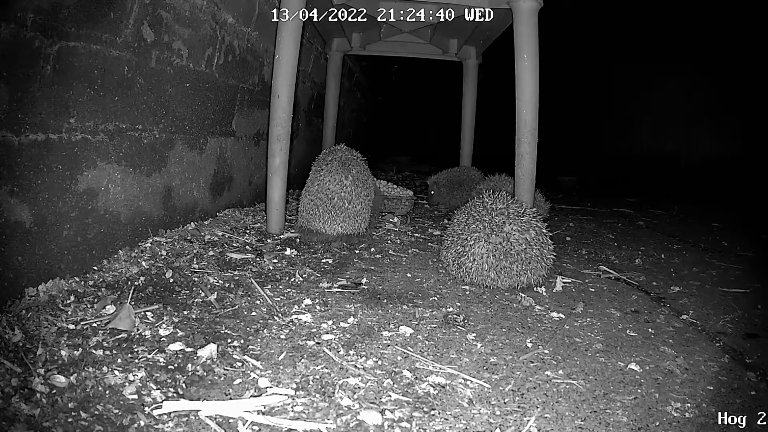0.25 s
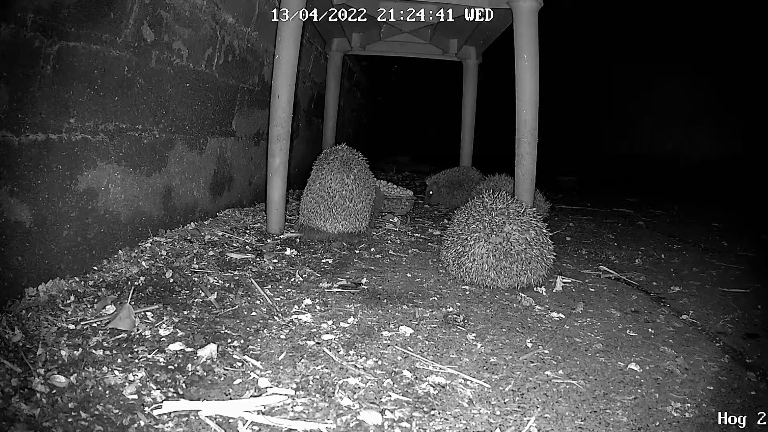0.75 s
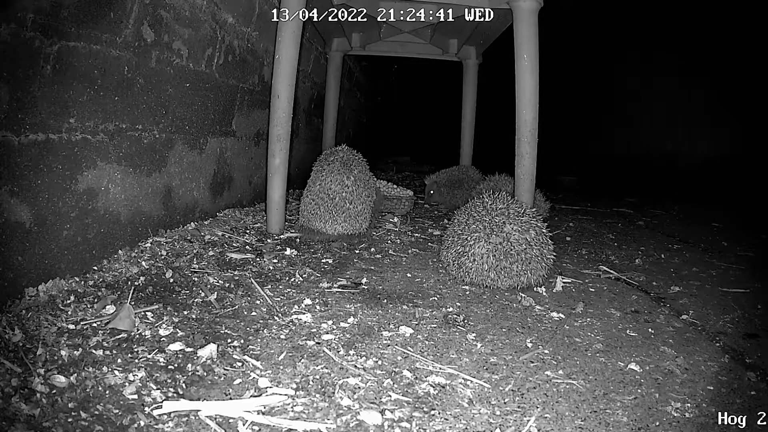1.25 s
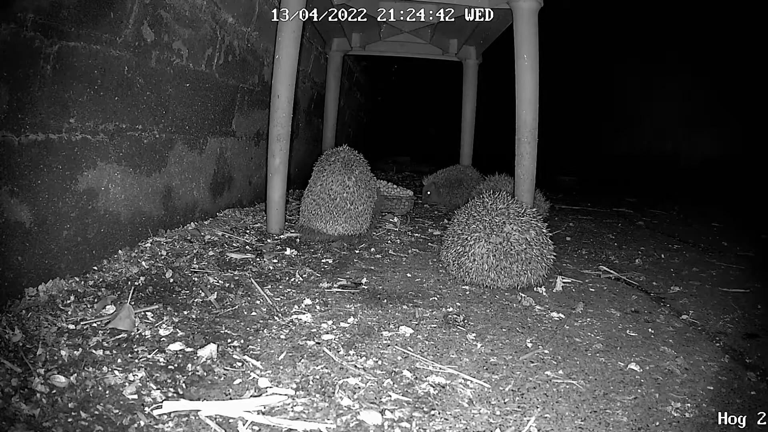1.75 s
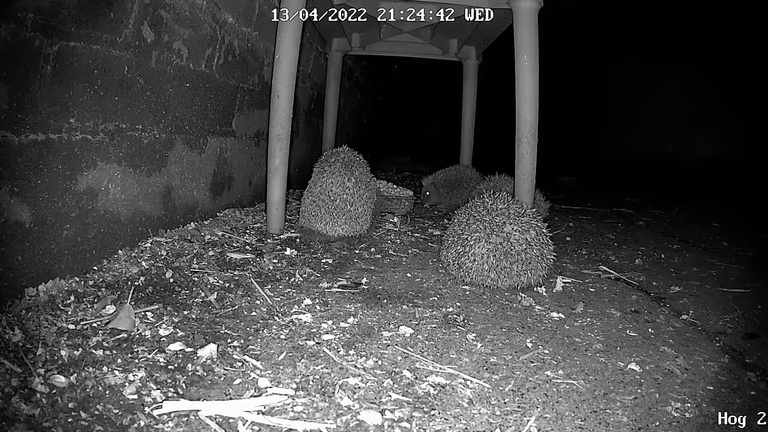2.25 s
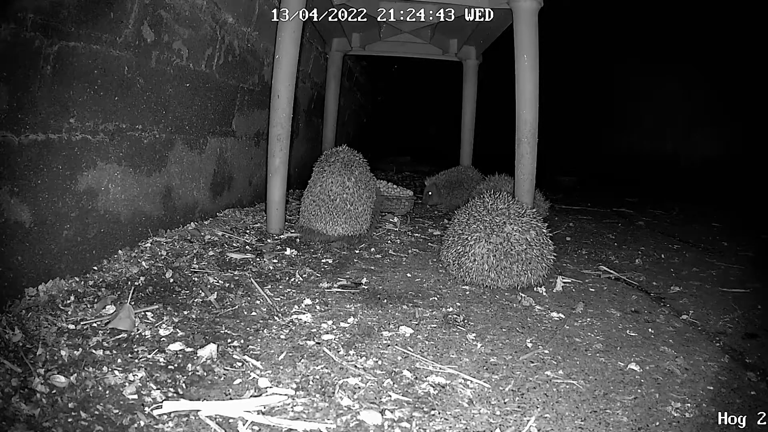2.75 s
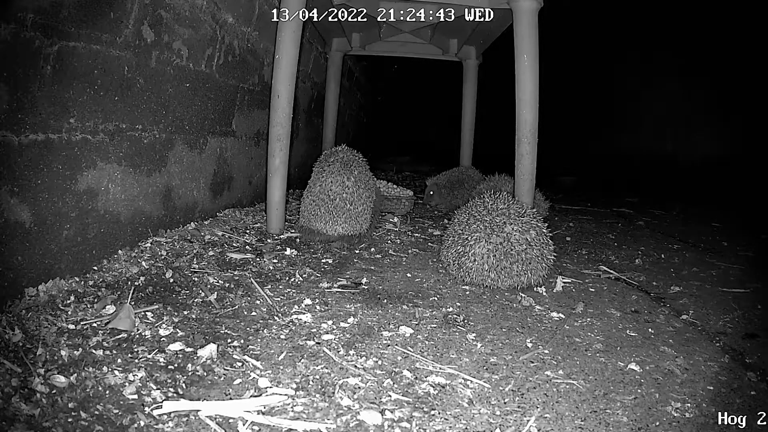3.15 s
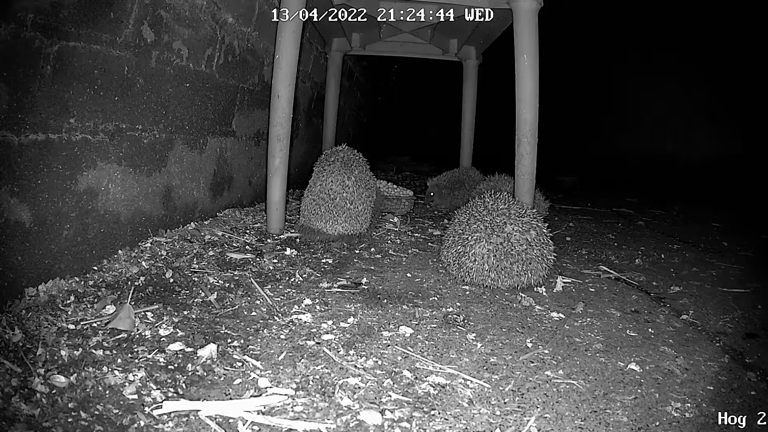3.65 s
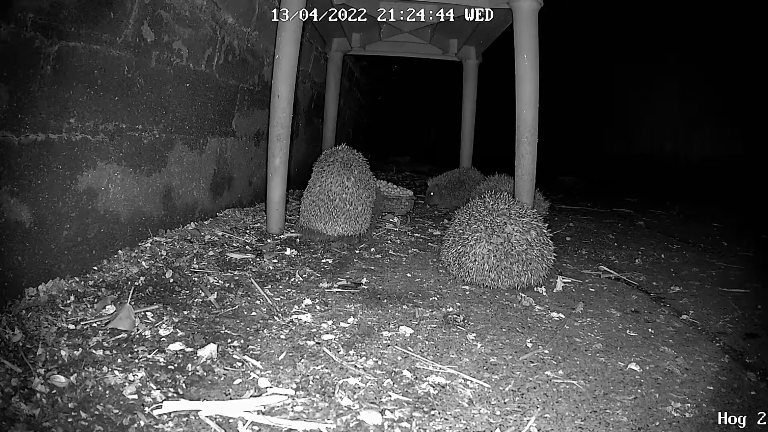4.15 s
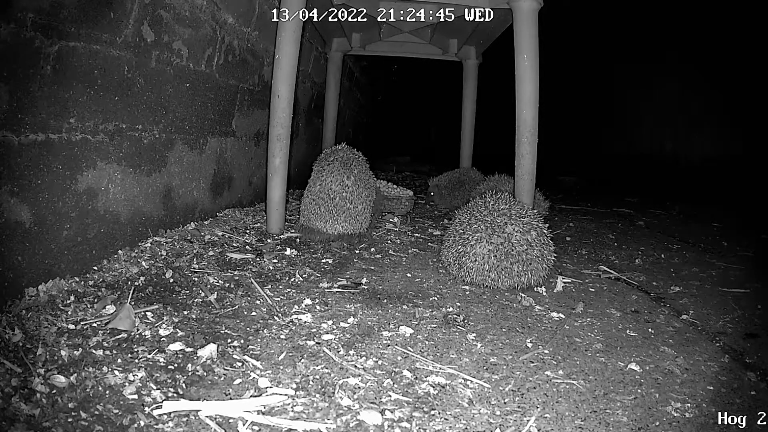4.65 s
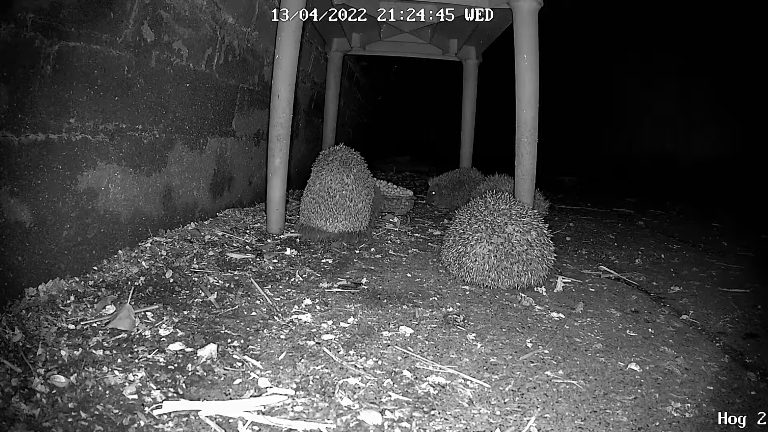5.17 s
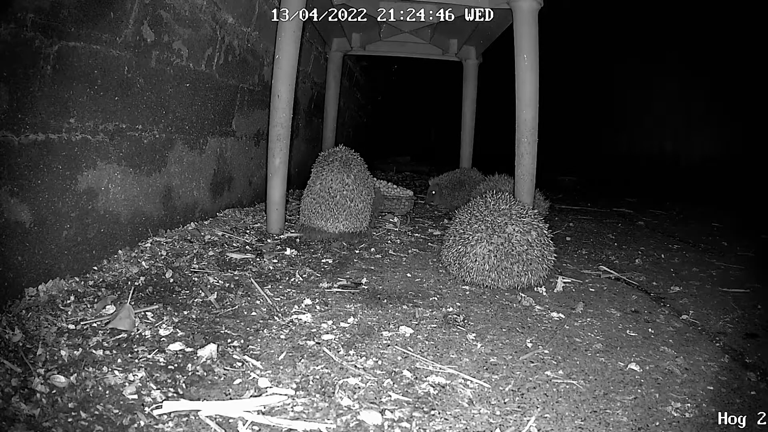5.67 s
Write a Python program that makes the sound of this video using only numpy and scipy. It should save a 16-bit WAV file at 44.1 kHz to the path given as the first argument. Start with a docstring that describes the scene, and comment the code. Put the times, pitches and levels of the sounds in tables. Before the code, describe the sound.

Brittle crunches and fine crackling chews from feeding hedgehogs, above dark night rumble, an intermittent low hum and faint regular high ticks.

```python
"""Dry biscuits snap between teeth, and chews grind the crumbs into a soft crackle: hedgehogs feed at night.
Each snap is a click with a run of smaller breaks, scattered by ground and wall and coloured by the dish.
The grinding is tiny pings on filtered noise; a gritty scrape and a thin squeak are heard as well.
Beneath lie steady night noise, a throbbing noise hum that switches on and off, and faint thin high ticks
at a strict rate. A wildlife camera rolls off the treble."""
import sys
import numpy as np
from scipy import signal
from scipy.fft import rfft, irfft, next_fast_len
from scipy.io import wavfile
from scipy.ndimage import uniform_filter1d, map_coordinates

SR = 44100
rng = np.random.default_rng(int(sys.argv[2]) if len(sys.argv) > 2 else 0)


def generate_wav(signal):
    """Clip the signal to [-1, 1] and save it as 16-bit WAV at the path in sys.argv[1]."""
    frames = np.transpose(np.atleast_2d(signal))
    scaled = np.clip(frames, -1, 1) * 32767
    pcm = np.round(scaled).astype(np.int16)
    wavfile.write(sys.argv[1], SR, pcm)


N = 260631

# Night background. Each row: frequency in Hz, relative density in dB per Hz.
NIGHT_SPECTRUM = [(10, -12), (25, 5), (55, 1.5), (100, -5.5), (200, -11), (300, -16), (550, -21.5),
                  (950, -20.5), (1250, -25), (1800, -33.5), (3000, -47), (6500, -44.5)]
# Low hum. Each row: frequency in Hz, relative density in dB per Hz.
HUM_SPECTRUM = [(8, -8), (20, 2), (60, -3), (110, -4.5), (160, -18), (210, -16), (300, -25), (500, -31.5),
                (1500, -51.5), (6000, -82.5)]
# Hiss that comes with the hum. Each row: frequency in Hz, relative density in dB per Hz.
FIZZ_SPECTRUM = [(2500, -22.5), (5000, -14), (5900, 0.5), (6400, 0), (7000, -9)]
# Stretches of hum. Each row: start in seconds, end in seconds, level in dB, mean peak of its throbs in dB.
HUM_STRETCHES = [(-.1, 1.056, -49.5, -48.5), (1.894, 3.45, -49.5, -47), (3.564, 3.717, -50, -48),
                 (3.992, 4.711, -50.5, -42)]
# Upper tone of the squeak. Each row: time in seconds, pitch in Hz, level before its wavering in dB.
SQUEAK_GLIDE = [(3.43, 6900, -90), (3.465, 6900, -74), (3.495, 6780, -73.5), (3.507, 6980, -73),
                (3.535, 6830, -73.5), (3.56, 6920, -73), (3.575, 6780, -74), (3.59, 6780, -95)]
# Scrape at the dish. Each row: time in seconds, level in dB.
SCRAPE_LEVEL = [(5.81, -110), (5.832, -68), (5.845, -60), (5.862, -54.5), (5.878, -52.5), (5.91, -57)]
# Colour of the scrape. Each row: frequency in Hz, relative level in dB.
SCRAPE_SPECTRUM = [(150, -14), (500, -10.5), (800, -1), (1200, -1.5), (1500, -16), (3000, -11.5),
                   (4400, -12.5), (6500, -19.5)]
# Chews. Each row: time of firmest pressure in seconds, level before the common gain in dB,
# length in seconds, treble relative to the rest as the mouth opens in dB.
CHEW_STROKES = [(0.152, -70.5, 0.36, -2), (0.436, -72, 0.14, -2), (0.664, -73.5, 0.077, -5),
                (1.014, -67.5, 0.11, 2), (1.265, -72.5, 0.24, 3.5), (1.386, -71, 0.36, 6.5),
                (1.628, -77, 0.7, 3), (1.865, -65.5, 0.12, 6), (1.906, -60.5, 0.14, 5.5),
                (2.093, -66.5, 0.12, -6), (2.196, -62.5, 0.15, -2), (2.453, -63.5, 0.15, 1),
                (2.58, -68, 0.14, 3), (2.772, -62.5, .19, -1), (3.054, -68.5, 0.23, -1),
                (3.362, -70, 0.38, 2.5), (3.634, -66.5, 0.14, -6), (3.915, -72, 0.32, -4),
                (4.062, -75.5, 0.29, 3), (4.252, -72, 0.34, -1), (4.572, -76, 0.099, 0),
                (4.813, -70.5, 0.072, -1), (4.947, -78, 0.28, 1), (5.283, -72.5, 0.2, -2),
                (5.559, -72.5, 0.22, 1)]
# Colour of the grinding. Each row: frequency in Hz, relative level in dB.
CRUMB_SPECTRUM = [(400, -34), (1400, -10), (1900, -2.5), (2500, -0.5), (2900, 0.5), (3250, -0.5),
                  (3850, -2.5), (4300, 2.5), (4650, -3.5), (5100, -10), (5700, -1.5), (6400, -5),
                  (7000, -11.5)]
# Biscuit snaps and tooth clicks. Each row: time in seconds, level of the click over 1 ms before the common
# gain in dB, pitch of the fragment in Hz, spill outside its band in dB.
BISCUIT_SNAPS = [(0.099, -63, 3400, -15), (0.155, -62, 4260, -15), (0.16, -59, 4400, -15),
                 (0.1698, -54, 3340, -13), (0.1845, -61, 4780, -11), (0.207, -57, 4830, -10),
                 (0.213, -62, 3780, -7), (0.2334, -44.0, 3760, -12.5), (0.2597, -57.5, 3100, -14),
                 (0.4291, -61.5, 3200, -19), (0.458, -65, 4000, -9), (0.647, -57.5, 4030, -14),
                 (0.666, -60.5, 3900, -11), (0.742, -38, 5700, -3), (0.7492, -46, 6600, -5),
                 (0.7513, -42.5, 3410, 6), (0.829, -38, 1960, -5.5), (0.833, -51.5, 1200, 2),
                 (0.8374, -56, 4200, -7), (0.848, -55, 3920, 0), (0.994, -57, 3290, 0),
                 (1.007, -45, 4240, -6.5), (1.085, -44.0, 3780, -4), (1.1308, -59.5, 2920, -3),
                 (1.1596, -35.5, 6000, 6), (1.1665, -34, 6600, -9.5), (1.2184, -63.5, 4700, 0),
                 (1.28, -64, 3770, -12), (1.331, -68, 4580, -11), (1.339, -58, 4060, -14),
                 (1.3511, -43, 3960, -14), (1.357, -53, 3500, -2), (1.3815, -41, 5000, -11),
                 (1.4121, -48.5, 5200, -13), (1.5694, -29, 2100, 1), (1.5766, -34.0, 4200, -5.5),
                 (1.7228, -56.5, 4000, -11), (1.7752, -40, 3900, -7), (1.781, -48, 1700, 15),
                 (1.8342, -40.5, 4000, -10), (1.8368, -44.5, 4330, -4), (1.8425, -50, 3360, -6),
                 (1.8986, -56, 4300, -5), (1.904, -43.5, 5060, -12), (1.924, -50, 2770, -6),
                 (2.1033, -53.5, 3180, -9), (2.1278, -51.5, 3940, -12), (2.1344, -64, 4600, -10),
                 (2.15, -44, 3280, -9), (2.1791, -60, 4060, -8), (2.1835, -43.5, 3600, -2),
                 (2.21, -57, 3000, -13), (2.2413, -61, 2170, -2), (2.4554, -56.5, 4340, -17),
                 (2.4695, -50, 3780, -14), (2.474, -53, 4200, -9), (2.4767, -50, 4100, -17),
                 (2.4797, -45.5, 3600, -14), (2.5236, -57.0, 4350, -9), (2.5282, -36, 4230, -7),
                 (2.5333, -62, 4660, -6), (2.5553, -51, 3500, -1), (2.5642, -57.0, 3250, -11),
                 (2.7415, -59, 3900, -18), (2.7542, -55, 4060, -12), (2.7612, -48, 4060, -12),
                 (2.764, -50, 4200, -25), (2.767, -54, 3920, -14), (2.7987, -51, 3170, -6),
                 (2.8503, -52, 2720, -12.5), (3.0216, -60, 3650, -23), (3.0273, -44.5, 3840, -26),
                 (3.0447, -52, 3900, -13), (3.047, -45, 3800, -13.5), (3.051, -49.5, 3410, -11),
                 (3.0665, -59, 3650, -5), (3.1118, -60, 3440, -8), (3.32, -64, 3870, -16),
                 (3.3312, -49, 4130, -10), (3.3504, -59, 3650, -17), (3.3716, -50, 4600, -10),
                 (3.375, -60, 3970, -15), (3.436, -65, 3860, -12), (3.4561, -47.5, 2340, -10),
                 (3.599, -62, 4150, -12), (3.6033, -60, 3590, -9), (3.6225, -51, 3410, -17),
                 (3.6252, -47, 3130, -13), (3.6284, -46, 3480, -10), (3.6386, -62, 3740, -10),
                 (3.6519, -60, 3700, -12), (3.6553, -62, 3320, -20), (3.678, -59, 4200, 2),
                 (3.7258, -57.5, 1910, -22), (3.899, -50.5, 3760, -24), (3.9224, -42, 2600, -7.5),
                 (3.9307, -52, 3300, -21), (3.9344, -56, 2070, -6), (3.98, -60, 2410, -21),
                 (4.0533, -66, 3670, -9), (4.0715, -66.5, 3530, -1), (4.1533, -61.5, 3870, -16),
                 (4.1835, -63.5, 3800, -15), (4.251, -53, 4060, -7), (4.263, -64, 4850, -8),
                 (4.2723, -58, 3200, -7), (4.333, -63.5, 4350, -7), (4.36, -63.5, 4200, -4),
                 (4.584, -65, 4400, -7), (4.8176, -63, 3410, -16), (4.8528, -53.5, 3250, -12),
                 (5.276, -52, 4070, -19), (5.282, -59, 3670, -3), (5.288, -56.5, 3500, -14),
                 (5.289, -58, 4030, -5), (5.29, -57.5, 3000, -18), (5.2937, -65, 3780, -5),
                 (5.2938, -68, 4200, -10), (5.5038, -63, 3900, -11), (5.532, -64, 3290, -13),
                 (5.6715, -52.5, 3940, -15), (5.6736, -56, 4120, -7), (5.6764, -59, 3750, -7),
                 (5.7422, -35.5, 5800, -9), (5.774, -52.5, 5950, -12), (5.841, -69, 4170, -9),
                 (5.8575, -65, 3200, -6), (5.8711, -32, 5900, -11.5), (5.8895, -61, 3400, -8)]
# Colour of teeth, dish and shelter. Each row: frequency in Hz, relative level in dB.
BITE_SPECTRUM = [(200, -32), (600, -11.5), (850, -6), (1150, -7.5), (1350, -5.5), (1850, 2.5), (2450, 0.5),
                 (2850, 4), (3250, -3), (3600, -1), (3900, -5), (4300, 5), (4650, 3), (5100, -4.5),
                 (5700, 0.5), (6300, -0.5), (6900, -7)]
# Faint ringing of the dish. Each row: frequency in Hz, mean relative level in dB.
DISH_MODES = [(1558, 6), (1865, -5), (2306, 3), (2834, 3.5), (3234, 5), (3554, 3.5), (4497, -13.5),
              (5663, -4), (6341, 6.5)]
# Hollow knock of the dish. Each row: frequency in Hz, mean relative level in dB.
KNOCK_MODES = [(540, -5), (830, -1.5), (1050, -5.5), (1200, 3.5)]
# Treble response of the camera. Each row: frequency in Hz, gain in dB.
CAMERA_RESPONSE = [(6500, 0), (6900, 2), (7300, -7), (7700, -16.5), (8200, -23)]

CAMERA_TOP_HZ = 8200
TICK_FIRST_S, TICK_PERIOD_S = 0.0294, 0.1024
THROBS_PER_S = 15  # mean rate
CHEW_DEPTH_DB, SWELL_SHARE = 18, 0.45  # swell in dB, and its share of the chew length
MUNCH_DB = -88  # grinding between the chews
MOUTH_HZ = 4900  # treble let out by the open mouth starts here
RUSTLE_GAIN = 0.6  # relative to the pings
BAND_HZ, BAND_OCTAVES = 4200, 0.29  # fragments below this pitch ring in a wider band
SPLINTER_T60_S, DISH_T60_S = 0.012, 0.04


def amp(db):
    """Decibels to gain."""
    return 10 ** (np.asarray(db) / 20)


def unit(x):
    """Scale to rms 1."""
    return x / np.sqrt(np.mean(x ** 2) + 1e-20)


def along(points, hz):
    """Values of (Hz, value) points, interpolated on a log frequency axis."""
    f, v = np.transpose(points)
    return np.interp(np.log(hz + 1), np.log(f + 1), v)


def curve(rows):
    """(s, value) rows as one value per sample."""
    return np.interp(np.arange(N) / SR, *np.transpose(rows))


def filtered(x, gain):
    """x times a gain that depends on frequency."""
    m = next_fast_len(N + SR // 2)
    return irfft(rfft(x, m) * gain(np.fft.rfftfreq(m, 1 / SR)), m)[:N]


def coloured(x, spectrum):
    """x filtered by a dB spectrum, at rms 1."""
    return unit(filtered(x, lambda hz: amp(along(spectrum, hz))))


def causal(db, size=1024):
    """Minimum-phase impulse response of energy 1: sharp in front, ringing behind."""
    cepstrum = irfft(np.log(amp(db)))
    cepstrum[1:size // 2] *= 2
    cepstrum[size // 2 + 1:] = 0
    h = irfft(np.exp(rfft(cepstrum)))
    return h / np.linalg.norm(h)


def add(track, s, sound):
    """Mix a sound in at time s."""
    i = int(np.clip(round(s * SR), 0, N))
    track[i:i + len(sound)] += sound[:N - i]


def grains(times, pitch_hz, scatter, life_s, spread_db):
    """Tiny damped pings at the given times, each with its own pitch and size; rms 1."""
    t = np.arange(SR // 100) / SR
    track = np.zeros(N)
    for s, (pitch, size) in zip(times, rng.standard_normal((len(times), 2))):
        own_hz = pitch_hz * np.exp(scatter * pitch)
        ping = np.sin(2 * np.pi * own_hz * t) * np.exp(-t / life_s)
        add(track, s, amp(spread_db * min(size, 2)) * ping)
    return unit(track)


def night(level_db=-56):
    """Steady low rumble with a faint hiss: coloured noise."""
    return amp(level_db) * coloured(rng.standard_normal(N), NIGHT_SPECTRUM)


def strict_ticks(level_db=-65.02, pitch_hz=5750, life_s=0.00032, vary_db=1.0):
    """Faint thin high ticks at a strict rate, uneven in strength: short damped sines."""
    t = np.arange(SR // 100) / SR
    envelope = t / life_s * np.exp(1 - t / life_s)
    tick = np.sin(2 * np.pi * pitch_hz * t) * envelope
    track = np.zeros(N)
    for s in np.arange(TICK_FIRST_S, N / SR, TICK_PERIOD_S):
        add(track, s, amp(level_db + vary_db * rng.standard_normal()) * tick)
    return track


def hum(edge_s=0.0079, evenness=0.76, fizz_db=-28, tick_hz=5900, tick_count=420):
    """Low noise hum without a pitch that switches on and off, with a faint high fizz."""
    t = np.arange(N) / SR
    level = np.zeros(N)
    for start, end, db, _ in HUM_STRETCHES:
        level += amp(db) * np.clip(np.minimum(t - start, end - t) / edge_s + .5, 0, 1)
    rumble = coloured(rng.standard_normal(N), HUM_SPECTRUM)
    # Dividing by part of its own short-term power evens out the rumble.
    power = np.abs(uniform_filter1d(rumble ** 2, size=2600)) + 1e-6
    even_rumble = unit(rumble / power ** (evenness / 2))
    tick_times = rng.random(tick_count) * N / SR
    ticks = grains(tick_times, tick_hz, scatter=0.04, life_s=0.001, spread_db=10)
    fizz = unit(coloured(rng.standard_normal(N), FIZZ_SPECTRUM) + .5 * ticks)
    return level * (even_rumble + amp(fizz_db) * fizz)


def throbs(width_s=0.0022, sag=0.069, recover_s=0.0058, jitter_s=0.01607, vary_db=4.0):
    """Uneven throbs of the hum: each one rounded push followed by a shallow sag."""
    t = np.arange(SR // 10) / SR - .02
    push = np.exp(-(t / width_s) ** 2) - sag * np.exp(-(t / recover_s - 1) ** 2)
    track = np.zeros(N)
    for k, (late, force) in enumerate(rng.standard_normal(size=(200, 2))):
        s = k / THROBS_PER_S + jitter_s * late
        for start, end, _, db in HUM_STRETCHES:
            if start < s < end:
                add(track, s + t[0], amp(db + vary_db * force) * push)
    return track


def squeak(lower_db=-1, lower_ratio=0.872, waver_db=3, jitter_hz=85):
    """Two thin, rough tones that glide together, each unsteady in pitch and strength."""
    rows = np.array(SQUEAK_GLIDE)
    noise = rng.standard_normal((2, 2, N))
    waver, jitter = unit(uniform_filter1d(noise, size=80, axis=2))
    pitch_hz = np.outer([1, lower_ratio], curve(rows[:, :2])) + jitter_hz * jitter
    tones = np.sin(2 * np.pi * np.cumsum(pitch_hz, axis=1) / SR)
    upper, lower = tones * amp(waver_db * (waver - 1.0))
    t = np.arange(N) / SR
    sounding = (t > rows[0, 0]) * (t < rows[-1, 0])
    return amp(curve(rows[:, ::2])) * sounding * (upper + amp(lower_db) * lower)


def scrape(rough=0.57, catch_db=4, catch_s=0.003):
    """Short gritty scrape at the dish: spiky noise whose strength wavers as it catches and slips."""
    t = np.arange(N) / SR
    grit = rng.standard_normal(N) * np.exp(rough * rng.standard_normal(N))
    drift = map_coordinates(rng.standard_normal(N // 8), [t / catch_s], mode='wrap')
    catches = amp(catch_db * np.clip(drift, -1.5, 1.5))
    level = amp(curve(SCRAPE_LEVEL)) * (t > SCRAPE_LEVEL[0][0])
    return level * coloured(grit * catches, SCRAPE_SPECTRUM)


def stroke(s, db, swell_db_per_s, ease_db_per_s):
    """Gain that swells to its peak at time s and then dies away, both linear in dB."""
    t = np.arange(N) / SR - s
    return amp(db + np.minimum(swell_db_per_s * t, -ease_db_per_s * t))


def chewing(pitch_hz=4000, gain_db=1, life_s=0.00025, count=6000):
    """Crumbs ground between the jaws: tiny uneven pings on a fine rustle, swelling with each chew."""
    pings = grains(rng.random(count) * N / SR, pitch_hz, scatter=.3, life_s=life_s, spread_db=7)
    rustle = coloured(rng.standard_normal(N), CRUMB_SPECTRUM)
    crumbs = unit(coloured(pings, CRUMB_SPECTRUM) + RUSTLE_GAIN * rustle)
    body = filtered(crumbs, lambda hz: 1 / (1 + (hz / MOUTH_HZ) ** 20))
    treble = crumbs - body
    swell_db, ease_db = CHEW_DEPTH_DB / SWELL_SHARE, CHEW_DEPTH_DB / (1 - SWELL_SHARE)
    body_level, treble_level = np.zeros(N), np.zeros(N)
    for s, db, length_s, open_db in CHEW_STROKES:
        pressure = stroke(s, db + gain_db, swell_db / length_s, ease_db / length_s)
        body_level = np.maximum(body_level, pressure)
        treble_level = np.maximum(treble_level, pressure * amp(open_db))
    munch = amp(MUNCH_DB)
    return np.hypot(body_level, munch) * body + np.hypot(treble_level, munch) * treble


def ring_modes(modes, t, vary_db):
    """Sum of steady modes, each with a random strength and phase."""
    total = np.zeros(len(t))
    for hz, db in modes:
        tone = np.sin(2 * np.pi * (hz * t + rng.random()))
        total += amp(db + vary_db * rng.standard_normal()) * tone
    return total


def shelter(x, near_db=-9.0, near_t60_s=0.019, far_db=-15, far_t60_s=0.11,
            dish_db=-17, knock_db=-16, knock_t60_s=0.075, vary_db=3):
    """Direct sound, scatter from ground and posts, a weaker wall tail, and the dish; redrawn per call."""
    t = np.arange(SR // 9) / SR
    near = rng.standard_normal(len(t)) * amp(-60 * t / near_t60_s) * (1 - np.exp(-t / 0.021))
    far = rng.standard_normal(len(t)) * amp(-60 * t / far_t60_s) * (1 - np.exp(-t / 0.0047))
    ring = ring_modes(DISH_MODES, t, vary_db) * amp(-60 * t / DISH_T60_S)
    knock = ring_modes(KNOCK_MODES, t, vary_db) * amp(-60 * t / knock_t60_s)
    knock *= 1 - np.exp(-t / 0.0065)
    response = np.zeros(len(t))
    for part, db in [(near, near_db), (far, far_db), (ring, dish_db), (knock, knock_db)]:
        response += amp(db) * part / np.linalg.norm(part)
    response[0] += 1  # direct sound
    return signal.fftconvolve(x, response)


def snap(db, centre_hz, spill_db, vary_db=0.5, crumble_db=-17, crumble_t60_s=0.085,
         splinter_db=-8, hard_db=-40, cleaner=0.23, size=1024):
    """One fracture: a sharp click, a burst of splinters and a sparse run of smaller breaks."""
    hz = np.fft.rfftfreq(size, 1 / SR)
    # A fragment pings around its own pitch; a crack right through spills over the whole range.
    width_octaves = BAND_OCTAVES * max(BAND_HZ / centre_hz, 1)
    band_power = np.exp(-(np.log2((hz + 1) / centre_hz) / width_octaves) ** 2)
    band = 10 * np.log10(band_power + amp(spill_db) ** 2)
    own = vary_db * np.interp(hz, np.linspace(0, SR / 2, 48), rng.standard_normal(48))
    click = causal(along(BITE_SPECTRUM, hz) + along(CAMERA_RESPONSE, hz) / 2 + band + own)
    t = np.arange(SR // 16) / SR
    after = t > .0007
    # High powers of noise leave sparse, spiky breaks.
    breaks = rng.standard_normal(len(t)) ** 5 * amp(-60 * t / crumble_t60_s) * after
    splinters = rng.standard_normal(len(t)) ** 3 * amp(-60 * t / SPLINTER_T60_S) * after
    debris = amp(crumble_db) * breaks / np.linalg.norm(breaks)
    debris += amp(splinter_db) * splinters / np.linalg.norm(splinters)
    # The harder the bite, the more cleanly the piece parts.
    blows = amp(-cleaner * (db - hard_db)) * debris
    blows[0] += 1
    # The root turns energy 1 into rms 1 over 1 ms.
    return amp(db) * signal.fftconvolve(blows, click) * np.sqrt(SR / 1000)


def crumb_snaps(above_chew_db=1, vary_db=1.0, scatter=0.25, count=3):
    """Each chew breaks a few crumbs near its peak, louder when it is firmer: rows of (s, dB)."""
    rows = []
    for s, db, length_s, _ in CHEW_STROKES:
        for when, force in np.clip(rng.standard_normal((count, 2)), -2, 2):
            rows.append((s + scatter * length_s * when, db + above_chew_db + vary_db * force))
    return rows


def biscuits(gain_db=-0.62, crumb_hz=4100, crumb_spill_db=-14):
    """Biscuits and crumbs snapped between the teeth, each with a freshly drawn scatter."""
    track = np.zeros(N)
    for s, db, centre_hz, spill_db in BISCUIT_SNAPS:
        add(track, s, amp(gain_db) * shelter(snap(db, centre_hz, spill_db)))
    for s, db in crumb_snaps():
        add(track, s, shelter(snap(db, crumb_hz, crumb_spill_db)))
    return track


def scene():
    """The feeding animals over the background, in mono."""
    background = night() + strict_ticks() + hum() + throbs()
    feeding = squeak() + scrape() + chewing() + biscuits()
    return (background + feeding)[None]


def record(dry):
    """The camera rolls off the treble and keeps nothing above its band limit."""
    return filtered(dry[0], lambda hz: amp(along(CAMERA_RESPONSE, hz)) * (hz < CAMERA_TOP_HZ))[None]


dry = scene()
out = record(dry)
generate_wav(out)
```